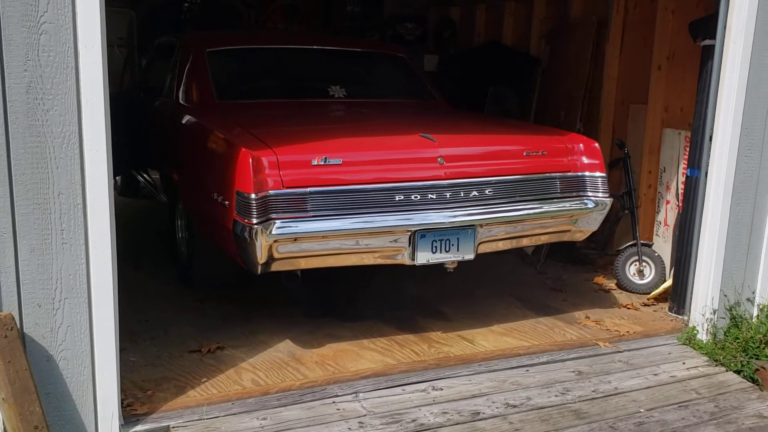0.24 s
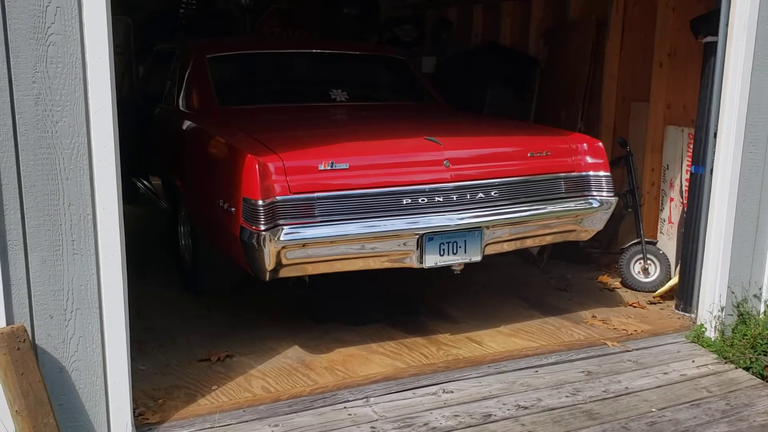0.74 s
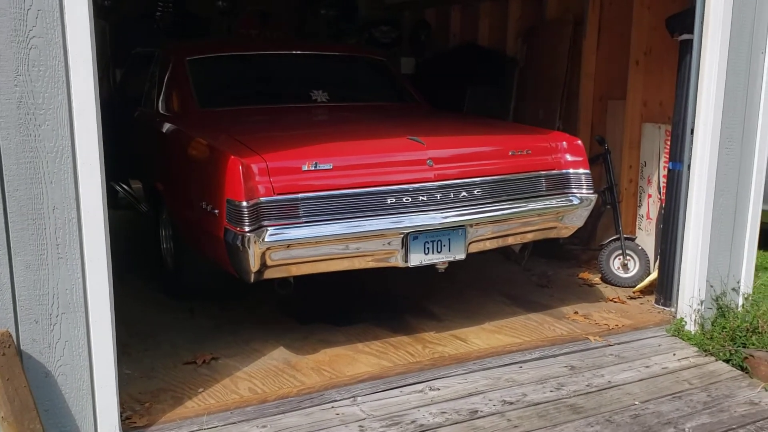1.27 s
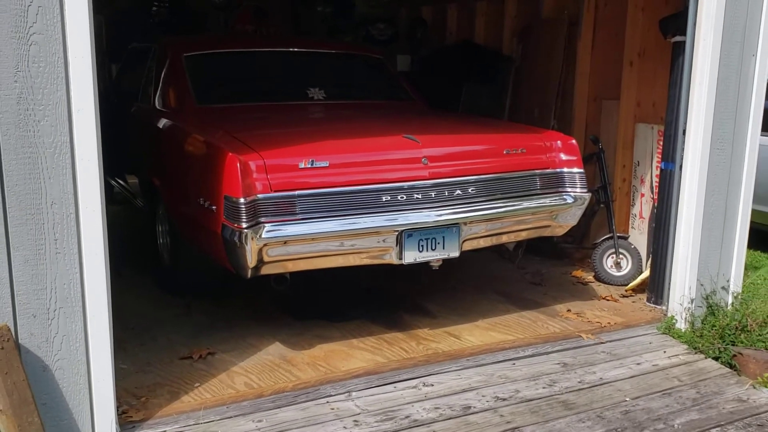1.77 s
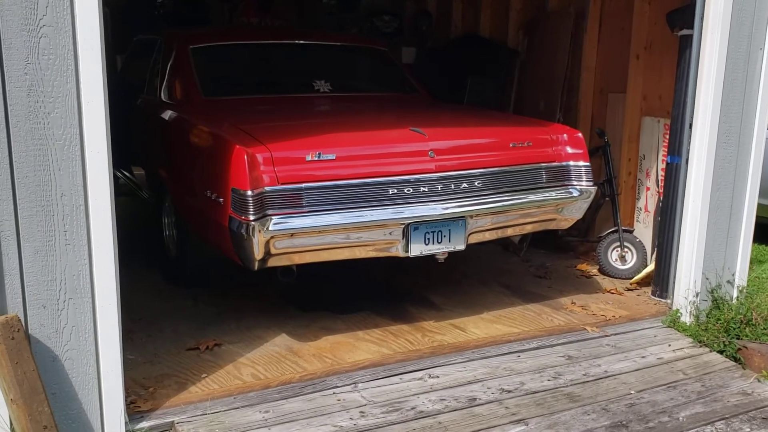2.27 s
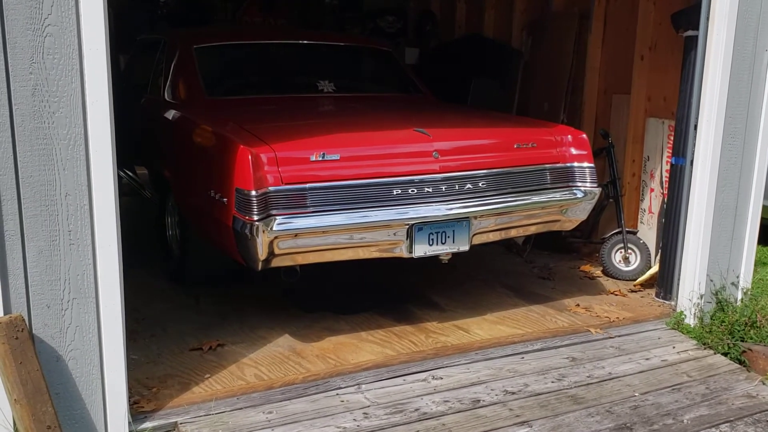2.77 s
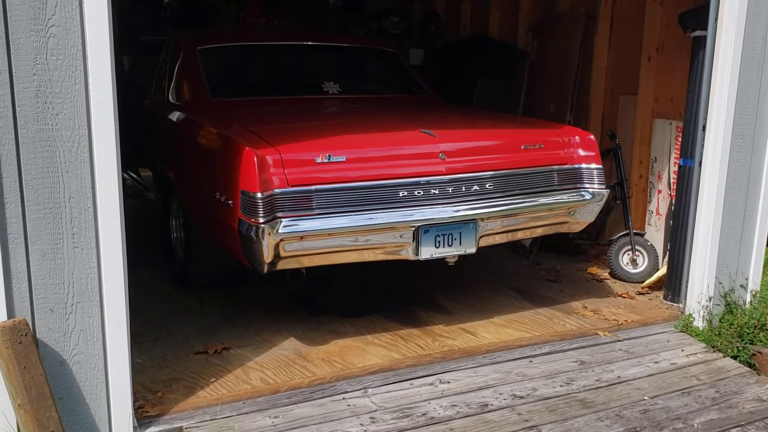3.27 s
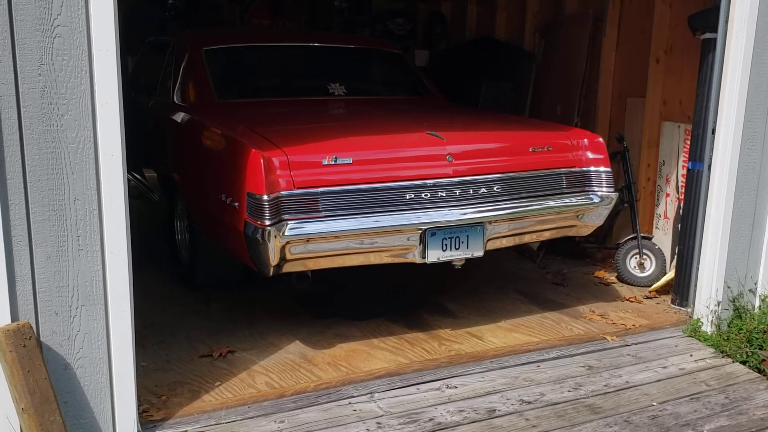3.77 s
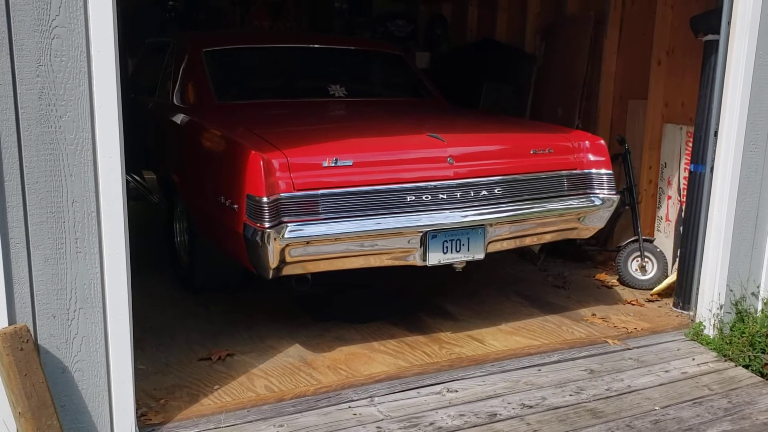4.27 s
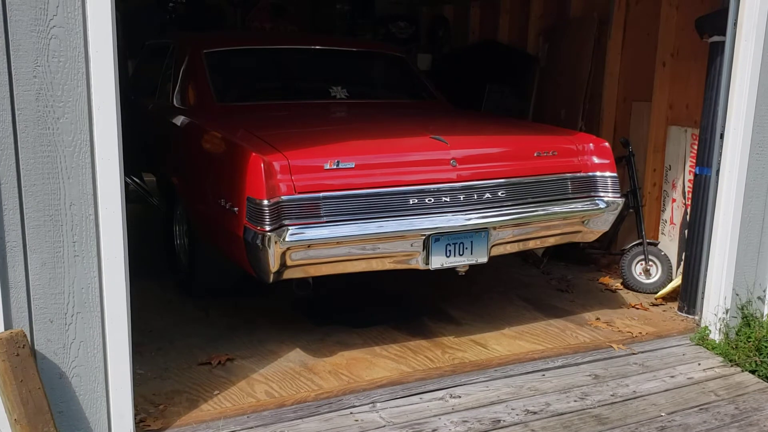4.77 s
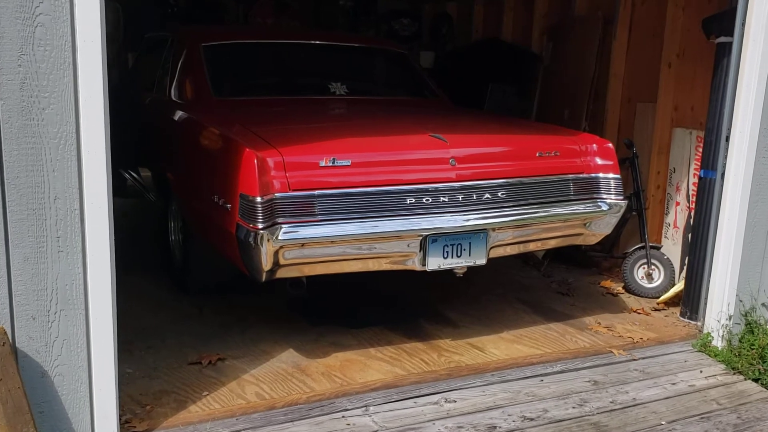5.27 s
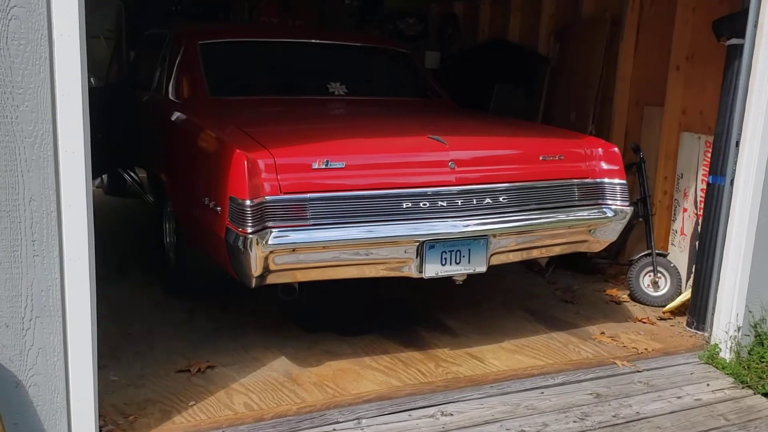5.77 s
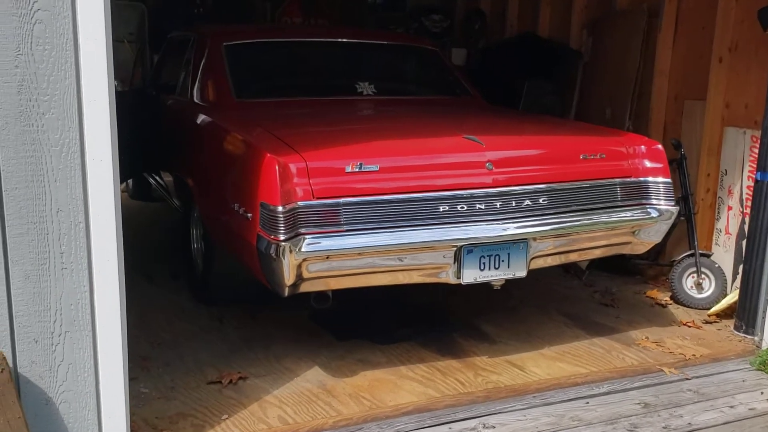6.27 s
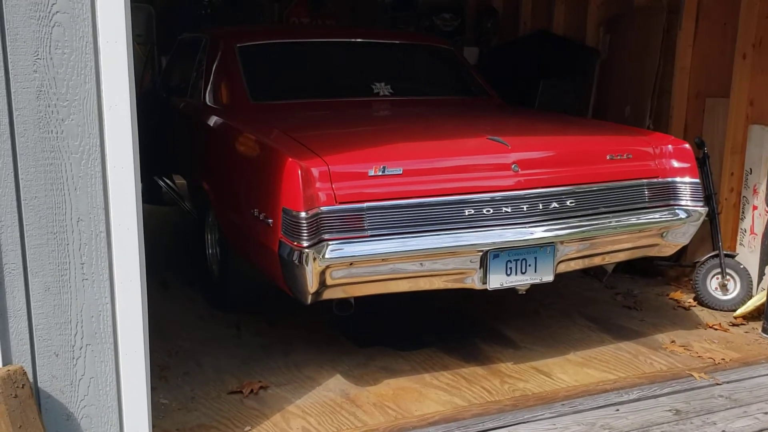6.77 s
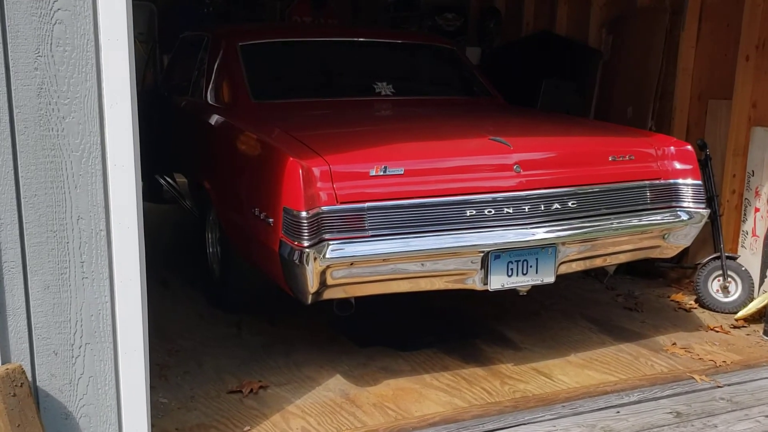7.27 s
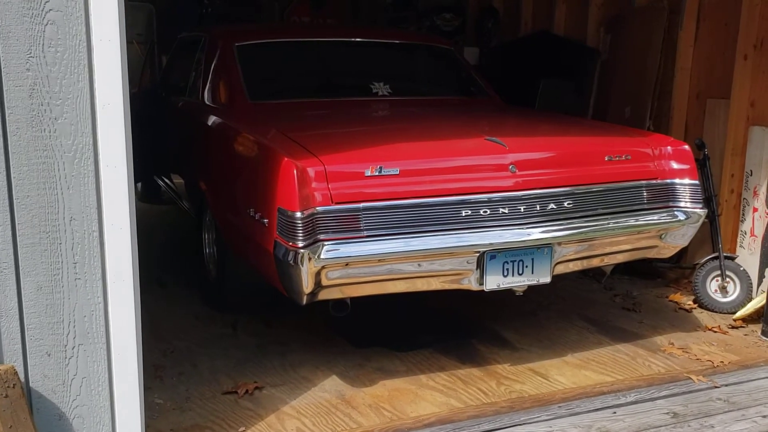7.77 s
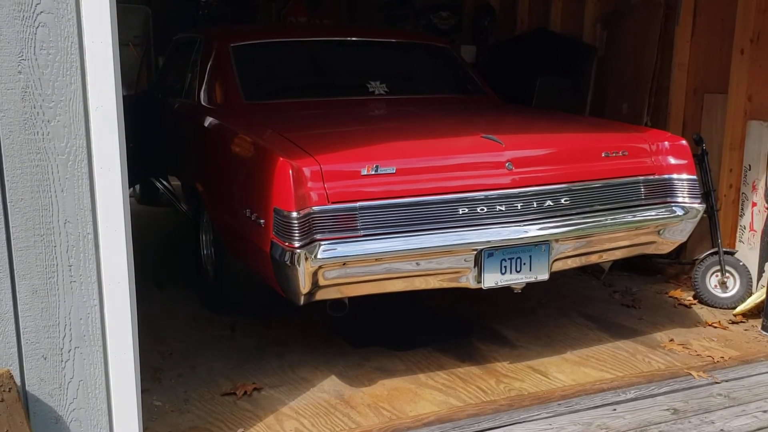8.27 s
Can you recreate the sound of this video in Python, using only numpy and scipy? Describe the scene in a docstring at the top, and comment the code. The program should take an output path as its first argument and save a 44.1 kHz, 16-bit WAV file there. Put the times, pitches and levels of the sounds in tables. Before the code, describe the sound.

A big V8 car engine idles with a deep, lumpy rumble in a small wooden garage, with one brief throttle blip.

```python
"""A big V8 idles in a small wooden garage, heard from the open door behind its tailpipes.
The sound swells in as the speed wanders. Each firing pushes a low pulse and a puff of rasping gas
out of the pipes, and the garage rings. Near 2 s one short blip of the throttle lifts the speed.
From about 4 s the engine sags into a lumpy, spitting chug, then recovers by 7 s and eases off again.
All along, its deep notes swell and fade as they slide through the resonances of mufflers and garage."""
import sys
import numpy as np
from scipy import signal
from scipy.fft import rfft, irfft, next_fast_len
from scipy.io import wavfile
from scipy.ndimage import uniform_filter1d

SR = 44100
rng = np.random.default_rng(int(sys.argv[2]) if len(sys.argv) > 2 else 0)


def log_audio(samples):
    """Write samples as a 16-bit WAV file to the path given in sys.argv[1]."""
    # one column per channel
    frames = np.atleast_2d(samples).T
    # limit to full scale, then quantise
    limited = np.clip(frames, -1, 1)
    pcm = np.round(limited * 32767).astype(np.int16)
    wavfile.write(sys.argv[1], SR, pcm)


N = 376173
TIME = np.arange(N) / SR


# How fast the engine runs: time_s, firings_per_s
SPEED = [(0.0, 101.26), (0.827, 88.42), (1.056, 92.02), (1.438, 112.76), (1.67, 106.05), (1.928, 137.16),
         (2.237, 112.76), (2.634, 92.13), (2.958, 104.94), (3.458, 94.81), (4.047, 86.64), (4.35, 80.8),
         (4.729, 84.69), (5.466, 94.98), (6.133, 98.3), (7.089, 104.07), (7.702, 95.18), (8.53, 88.22)]
# How hard the fuel burns, compared with an easy idle: time_s, load_db
LOAD = [(0.0, -3), (0.72, -1), (0.92, 4.5), (1.4, 4.5), (1.56, -9.5), (1.66, 2), (1.78, 7.5), (1.93, 7),
        (2.02, -11), (2.6, -10.5), (2.74, 3.5), (2.9, 0.3), (3.1, -5), (4.1, -2.8), (4.4, 0.3), (4.5, 3),
        (5.6, 2.1), (7.0, 0.7), (7.5, -2), (8.53, 1)]
def engine(idle_hz=95, shut_hz_per_s=93):
    """The engine runs rougher when slow or coasting; slowing by shut_hz_per_s means a shut throttle."""
    firing_hz, load_db = curve(SPEED), curve(LOAD)
    octaves = np.log2(firing_hz / idle_hz)
    slowing = -np.gradient(smooth(firing_hz, size=2000)) * SR
    coasting = np.clip(slowing / shut_hz_per_s, 0, 1)
    rough = 0.97 * (idle_hz / firing_hz) ** 4 + 1.4 * coasting
    return firing_hz, load_db, octaves, coasting, rough


# The eight cylinders in firing order: pulse_size_offset, puff_db
CYLINDERS = [(0.11, 1), (-0.54, -4), (0.22, 3), (0.9, 6), (-0.54, -4), (0.26, 1.5), (-0.18, 2.5),
             (-0.28, -4.5)]
def cylinders(firing_hz):
    """The cylinders take turns; `at` holds the samples at which an exhaust valve opens."""
    firings = np.cumsum(firing_hz) / SR + 1.21
    at = np.flatnonzero(np.diff(np.floor(firings - .3)))
    pulse, puff_db = np.array(CYLINDERS)[firings[at].astype(int) % len(CYLINDERS)].T
    return firings / len(CYLINDERS), at, pulse, puff_db


# The strongest exhaust notes: waves_per_engine_cycle, base_db, db_per_octave_of_speed, waver_db
NOTES = [(5, -24, 1, 4.5), (8, -15.5, -6, 1.27), (10, -26.5, 7.5, 2), (13, -35.5, -9, 4.5),
         (16, -29.5, 4, 1), (20, -32, 5, 0.5), (21, -29, -1, 3.5), (22, -35, -2, 1)]
# How mufflers and garage favour some pitches: pitch_hz, gain_db
RESONANCES = [(50.0, -21), (60.0, 1.9), (80.0, -4.5), (95.0, 0.5), (104.0, 0.5), (114.0, -7), (128.0, -0.5),
              (168.0, -1.5), (186.0, -6.5), (200.0, -17), (216.0, -13), (238.0, -10.5), (252.0, -16.5),
              (270.0, -3.5), (295.0, -6.5), (340.0, -22)]
def boom(cycles, cycle_hz, octaves, rough, swing, level_db):
    """Deep exhaust notes follow the engine's speed; in rough running each wavers on its own."""
    out = np.zeros(N)
    for multiple, base_db, db_per_octave, waver_db in NOTES:
        pitch_hz = multiple * cycle_hz
        # a note falls behind as it climbs through the garage's lowest resonance
        lag = np.arctan((pitch_hz - 55) / 3)
        wobble_db = waver_db * np.minimum(rough, 1) ** 2 * np.minimum(waver(), .5)
        note_db = base_db + db_per_octave * octaves + at_pitch(RESONANCES, pitch_hz) + wobble_db
        out += amp(note_db) * np.cos(2 * np.pi * multiple * cycles - lag)
    return amp(level_db) * np.sqrt(2) * out * (1 + swing)


# Tone of the uneven pulses after the mufflers: pitch_hz, gain_db
THROB_TONE = [(25, -20.5), (42, -26), (52, 7.5), (74, 9), (105, 9), (126, -9.5), (150, 7), (172, 1),
              (198, -7.5), (222, 1.5), (262, -0.5), (295, -2.5), (320, -19.5), (420, -25), (900, -48.5)]
def throb(at, sizes, level_db):
    """No two pulses are the same size, which puts a burble around the notes."""
    return amp(level_db) * steady(pipe(clicks(at, sizes), THROB_TONE), size=4000)


# Tone of the puffs in the pipe: pitch_hz, gain_db
BARK_TONE = [(100, -30.5), (250, 4.5), (340, 2.5), (410, -4.5), (520, 0.5), (700, -1), (830, -4),
             (1100, -6), (1600, -4.5), (2000, -9.5), (2800, -9), (6000, -60)]
def bark(at, sizes, level_db, thump=5):
    """The steep front of each pulse and its puff of gas make the tailpipes ring."""
    kicks = clicks(at, sizes)
    drive = thump * kicks + puffs(kicks, rise_s=0.0014, fall_s=0.0096)
    return amp(level_db) * steady(garage(pipe(drive, BARK_TONE)), size=6000)


def puffs(kicks, rise_s, fall_s):
    """Each kick lets out a burst of swirling gas that swells and dies."""
    t = np.arange(SR // 10) / SR
    shape = (1 - np.exp(-t / rise_s)) * np.exp(-t / fall_s)
    return signal.oaconvolve(kicks, shape / shape.max())[:N] * rng.standard_normal(N)


# Pitches at which the tailpipes ring: pitch_hz, width_hz, lift_db
PIPE_RINGS = [(347, 21, 8.5), (476.7, 32, 7.5), (566.7, 14, 8), (632, 25, 8.5), (709, 26, 12),
              (934.5, 45, 12), (1140, 60, 4), (1340, 39, 5.5), (1517, 38, 8.5), (1645, 50, 6),
              (1754, 41, 4.5), (2060, 42, 1.5), (2450, 95, 4), (4670, 350, 2.5)]
def pipe(x, tone, size=16384):
    """Gives a sound a broad tone with the ringing of the tailpipes on top."""
    hz = abs(np.fft.fftfreq(size, 1 / SR))
    peaks_db = sum(lift / (1 + (2 * (hz - pitch) / width) ** 2) for pitch, width, lift in PIPE_RINGS)
    log_gain = np.log(amp(at_pitch(tone, hz) + peaks_db))
    spectrum = np.exp(np.conj(signal.hilbert(log_gain)))  # rings after a kick, never before
    ring = np.fft.ifft(spectrum).real[:size // 2]
    return signal.oaconvolve(x, ring / np.linalg.norm(ring))[:N]


def rasp(at, sizes, level_db):
    """Gas tears out of the pipe mouths in short jets over a weak steady flow."""
    gas = jets(clicks(at, sizes), flow=0.14, rise_s=0.0025, fall_s=0.0029, hang_s=0.02, echo=2.8)
    return amp(level_db) * steady(gas, size=4500)


# Tone of the gas jet at the pipe mouth: pitch_hz, gain_db
JET_TONE = [(500, -28), (1200, -10.5), (2000, -5), (2700, -1), (3600, 0), (4600, 1), (5700, -1),
            (7200, 0.5), (8400, -6), (10300, -2.5), (12000, -1), (13800, -4), (15300, -3.5), (16500, -3)]
def jets(kicks, flow, rise_s, fall_s, hang_s, echo):
    """Bursts of hissing gas; the garage scatters them into a tail that is different at each ear."""
    t = np.arange(SR // 4) / SR
    burst = ((1 - np.exp(-t / rise_s)) * np.exp(-t / fall_s)) ** 2
    tail = (1 - np.exp(-t / fall_s)) * np.exp(-t / hang_s)
    shape = burst / burst.sum() + echo * tail / tail.sum()
    power = abs(signal.oaconvolve(kicks ** 2, shape / shape.max())[:N]) + flow ** 2
    return np.array([pipe(np.sqrt(power) * noise, JET_TONE) for noise in rng.standard_normal((2, N))])


# Hard burns that spit from the pipe and shove the engine: start_s, strength_db, bass_swell
SPITS = [(.131, -21, 0.25), (.409, -21.5, .1), (.45, -20.5, 0.13), (0.508, -18, 0.21), (0.625, -18, 0.4),
         (0.688, -21.5, 0.11), (0.745, -27, 0.53), (0.801, -18.5, 0.23), (0.871, -16.5, 0.17),
         (1.003, -18, 0.16), (2.974, -23, .05), (3.672, -20.5, 0.16), (3.929, -20.5, 0.28),
         (4.114, -25, 0.54), (4.182, -17.5, 0.52), (4.262, -15.5, 0.3), (4.32, -21, 0.98),
         (4.377, -23, 0.23), (4.459, -13, 1), (4.513, -13.5, 1), (4.573, -17, 0.49), (4.648, -12, 0.62),
         (4.717, -17, 0.52), (4.784, -16, 0.94), (4.837, -12.5, 0.62), (4.904, -15.5, 0.54),
         (4.963, -16, 0.58), (5.021, -18.5, 0.68), (5.088, -17, 0.43), (5.148, -19.5, 0.12),
         (5.269, -20, 0.056), (5.463, -16.5, 0.11), (8.035, -24, 0.098), (8.115, -23, .05),
         (8.158, -19, .45)]
def spits(at, puff_db, load_db, small_chance=.045):
    """A hard burn ends in a loud jet that rings the pipe; strong cylinders add small spits by chance."""
    start_s, strength_db, _ = np.transpose(SPITS)
    spitting = rng.random(len(at)) < small_chance * amp(puff_db) ** 2 * (1 - lull()[at])
    small = spitting * amp(-23.5 + load_db + 1.5 * rng.standard_normal(len(at)))
    kicks = clicks((start_s * SR).astype(int) - SR // 1000, amp(strength_db)) + clicks(at, small)
    jet = jets(kicks, flow=0, rise_s=0.0024, fall_s=0.0041, hang_s=0.011, echo=3.6)
    ring = garage(pipe(puffs(kicks, rise_s=0.0023, fall_s=0.018), BARK_TONE))
    return amp(-5) * jet + amp(-13) * ring


def chug(rough, length_s=0.064, lag_s=.012, rock_hz=16.7, width_hz=6.4, depth=0.07):
    """The bass swells just after each spit, and a rough-running engine also rocks at random."""
    start_s, _, swell = np.transpose(SPITS)
    shoves = clicks(((start_s + lag_s) * SR).astype(int), swell)
    humps = signal.oaconvolve(shoves, np.hanning(int(length_s * SR)), "same")
    size = next_fast_len(N, True)
    band = np.exp(-(2 * (np.fft.rfftfreq(size, 1 / SR) - rock_hz) / width_hz) ** 2)
    rocking = irfft(rfft(rng.standard_normal(size)) * band, size)[:N]
    return 2 * (humps - smooth(humps, size=3800)) + depth * rough * rocking / rocking.std()


def lull(lead_samples=1300):
    """1 just before each hard burn, when a weak firing leaves the fuel for it; otherwise 0."""
    at = (np.transpose(SPITS)[0] * SR).astype(int)
    ones = np.ones(len(at))
    on_off = clicks(at - lead_samples, ones) - clicks(at - lead_samples // 12, ones)
    return np.minimum(np.cumsum(on_off), 1)


# Brief whistles at the pipe mouth: middle_s, pitch_hz, level_db
WHISTLES = [(.955, 5100, -34), (1.29, 4800, -32), (1.437, 4600, -28), (2.8, 5060, -31),
            (2.886, 4750, -29.5), (3.434, 4670, -33)]
def whistles(length_s=0.069, width_hz=550):
    """The jet whistles: a narrow band of hiss swells and fades within a few firings."""
    out = np.zeros((2, N))
    for middle_s, pitch_hz, level_db in WHISTLES:
        edges_hz = (pitch_hz - width_hz / 2, pitch_hz + width_hz / 2)
        band = signal.butter(2, edges_hz, "band", fs=SR, output="sos")
        size, start = int(length_s * SR), int((middle_s - length_s / 2) * SR)
        tone = signal.sosfilt(band, rng.standard_normal((2, size)))
        out[:, start:start + size] += amp(level_db) * tone / tone.std() * np.hanning(size)
    return out


def sputter(x, spread_db=2.3):
    """Random patches of louder and softer hiss give each puff its own tone."""
    slices = signal.stft(x, SR, nperseg=512)[2]
    patches = uniform_filter1d(rng.standard_normal(slices.shape[1:]), size=7, axis=0)  # across pitch
    patches = uniform_filter1d(patches, size=5, axis=1)  # across time
    gain = amp(spread_db * patches / patches.std())
    return signal.istft(slices * gain / np.sqrt(np.mean(gain ** 2)), SR, nperseg=512)[1][:, :N]


# Time for the echo to drop 60 dB (below zero it grows instead): pitch_hz, fade_s
ECHO_FADE = [(200, 3), (1000, -0.3), (5000, .4), (15000, 5)]
# Strength of the echo compared with the direct sound: pitch_hz, level_db
ECHO_LEVEL = [(60, -24), (250, -19), (500, -15), (1000, -8.5), (2000, -1.5), (4000, 8.5)]
def garage(x, size=16384):
    """The walls add a short, dense echo to the direct sound, different at each ear."""
    hz, t, noise = signal.stft(rng.standard_normal((2, size)), SR, nperseg=256)
    shape = amp(-60 * t / at_pitch(ECHO_FADE, hz)[:, None])
    shape /= np.sqrt((shape ** 2).mean(1, keepdims=True) * size)
    tail = signal.istft(noise * shape, SR, nperseg=256)[1][:, :size]
    echo = amp(at_pitch(ECHO_LEVEL, np.fft.rfftfreq(2 * size, 1 / SR)))
    response = (1 + echo * rfft(tail, 2 * size)) / np.sqrt(1 + echo ** 2)
    return signal.oaconvolve(x[None], irfft(response)[:, :size], axes=1)[:, :N]


def amp(db):
    """Turns decibels into a gain."""
    return 10 ** (np.asarray(db) / 20)


def curve(rows):
    """A time table's value at every sample."""
    return np.interp(TIME, *np.transpose(rows))


def at_pitch(rows, hz):
    """A pitch table's value at hz, with straight lines between rows on an octave scale."""
    pitch_hz, value = np.transpose(rows)
    return np.interp(np.log(hz + 1), np.log(pitch_hz), value)


def smooth(x, size):
    """A running average with soft edges."""
    return uniform_filter1d(uniform_filter1d(x, size), size)


def steady(x, size):
    """Brings the slow level to 1 and keeps the single beats."""
    return x / np.sqrt(smooth(np.atleast_2d(x ** 2).mean(0), size) + 1e-18)


def clicks(at, sizes):
    """Clicks of the given sizes at the given samples."""
    return np.bincount(np.clip(at, 0, N - 1), sizes, N)


def waver(turns_per_s=11):
    """A slow random curve, about 1 in size."""
    points = rng.standard_normal(400)
    return np.interp(TIME * turns_per_s, np.arange(len(points)), points)


def scene(jitter_s=0.00015, scatter_db=3.65):
    """One engine times all layers; its speed and load set how loud they are."""
    firing_hz, load_db, octaves, coasting, rough = engine()
    cycles, at, pulse, puff_db = cylinders(firing_hz)
    burn, scatter, late = rng.standard_normal((len(at), 3)).T
    swing = chug(rough)
    jet_db = puff_db + scatter_db * scatter + 9 * swing[at]
    jet_db *= 1 - 0.44 * coasting[at]  # with the throttle shut, the jets are more alike
    jet_db -= 3 * lull()[at]
    fired = at + (jitter_s * late * SR).astype(int)
    notes = boom(cycles, firing_hz / len(CYLINDERS), octaves, rough, swing,
                 level_db=0.36 * load_db - 4 * coasting)
    burble = throb(fired, pulse + 0.6 * rough[at] * burn,
                   level_db=-24 + 0.16 * load_db + 6.5 * octaves - 4.5 * swing)
    ring = bark(fired, amp(0.58 * jet_db), level_db=-33 + 0.74 * load_db + 5 * octaves)
    hiss = rasp(fired, amp(jet_db), level_db=-30 + load_db)
    gas = sputter(hiss + spits(fired, puff_db, load_db[at]) + whistles())
    return notes + burble + ring + gas


# How much louder the left side is: pitch_hz, left_over_right_db
LEFT_LEAN = [(60, 2), (250, 3.5), (1000, 1.5), (2000, 2.6), (4000, 2.5), (8000, 8), (13000, 3)]
def record(dry, fade_from_db=-10, fade_s=0.95, top_hz=16000):
    """The sound swells in; the left microphone hears more, and both lose the highest treble."""
    size = next_fast_len(N)
    hz = np.fft.rfftfreq(size, 1 / SR)
    sides = amp(np.array([[1], [-1]]) * at_pitch(LEFT_LEAN, hz) / 2)
    fade = amp(fade_from_db * np.maximum(1 - TIME / fade_s, 0))
    heard = fade * irfft(rfft(dry, size) * sides / sides.mean(0), size)[:, :N]
    treble_cut = signal.firwin(511, top_hz, window=("kaiser", 9), fs=SR)
    return signal.oaconvolve(heard, treble_cut[None], "same")


dry = scene()
out = record(dry)
log_audio(out)
```